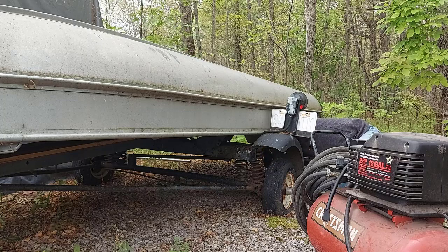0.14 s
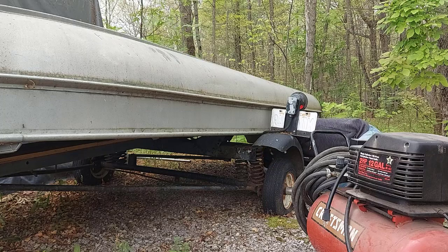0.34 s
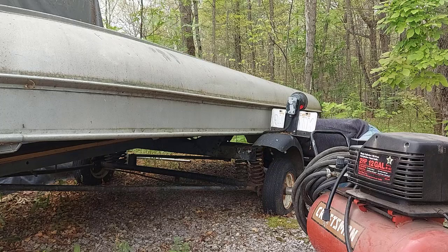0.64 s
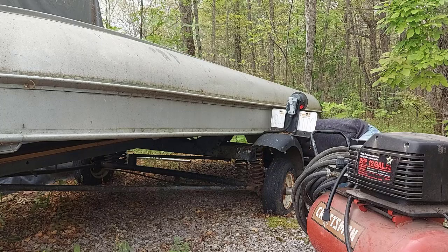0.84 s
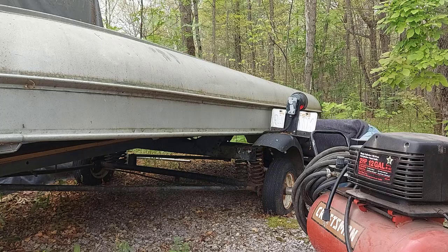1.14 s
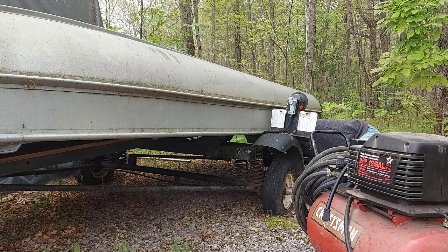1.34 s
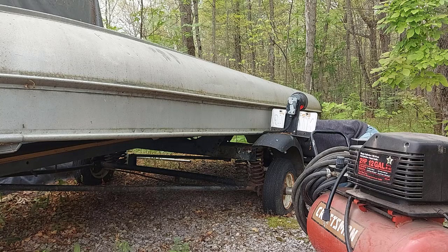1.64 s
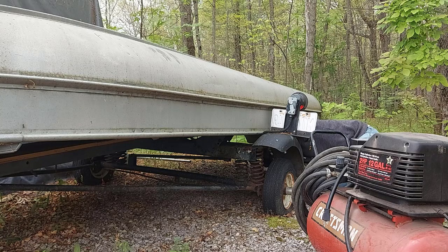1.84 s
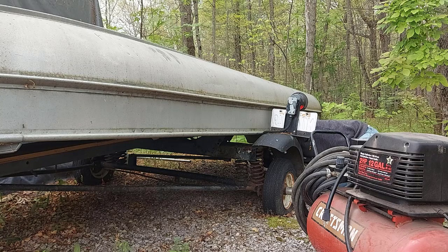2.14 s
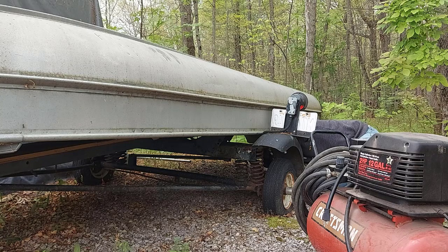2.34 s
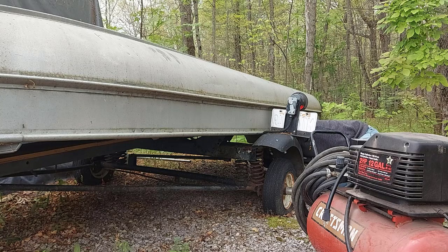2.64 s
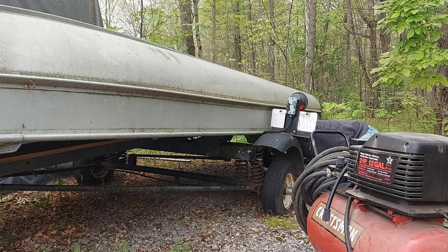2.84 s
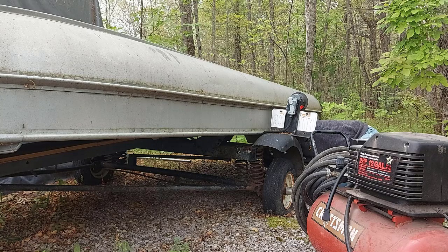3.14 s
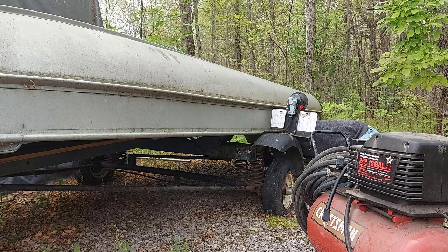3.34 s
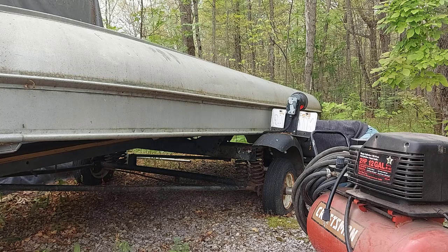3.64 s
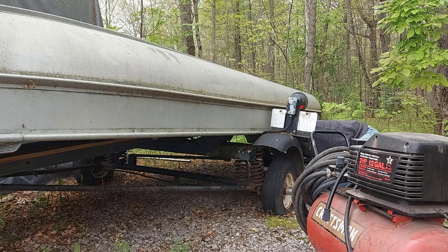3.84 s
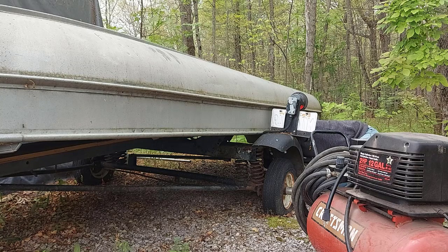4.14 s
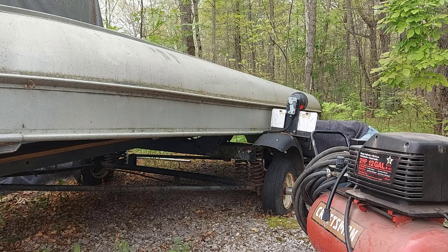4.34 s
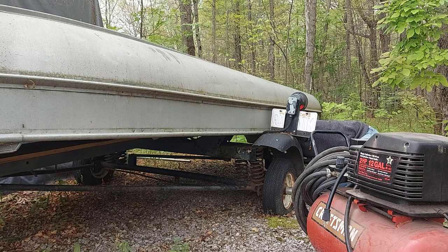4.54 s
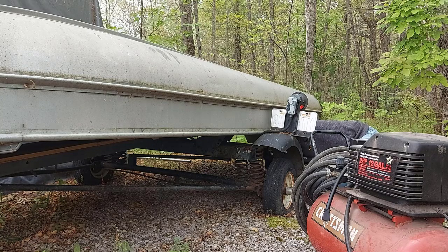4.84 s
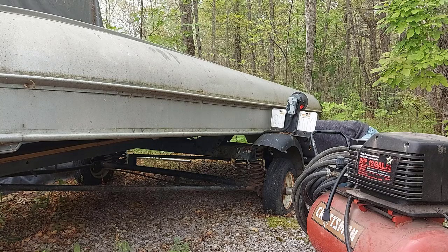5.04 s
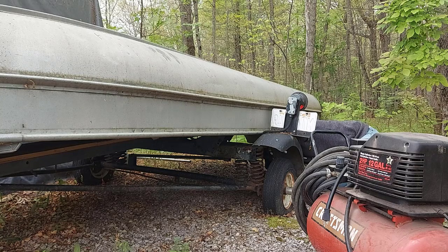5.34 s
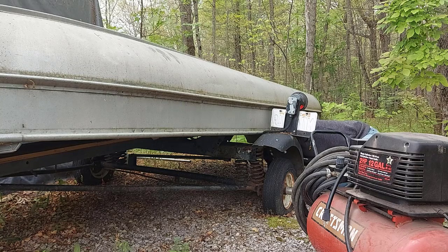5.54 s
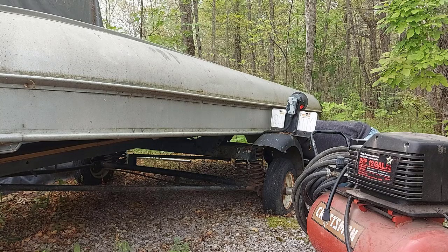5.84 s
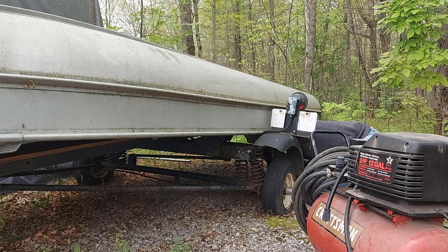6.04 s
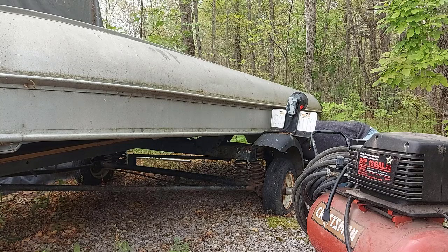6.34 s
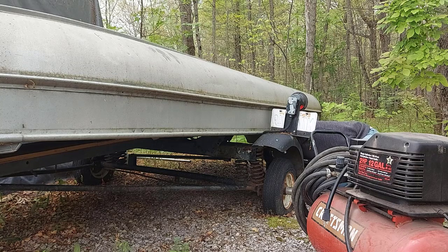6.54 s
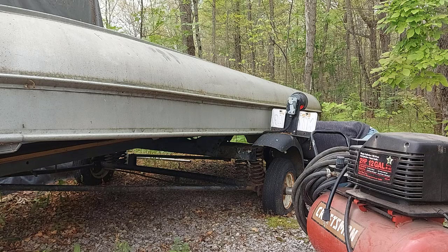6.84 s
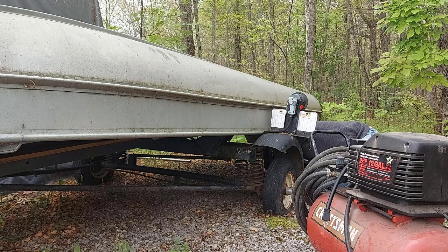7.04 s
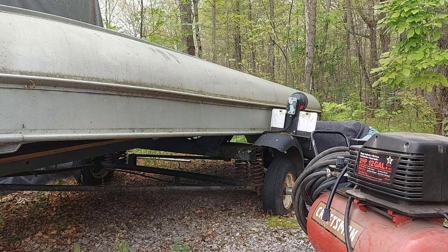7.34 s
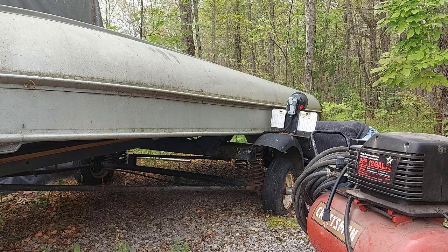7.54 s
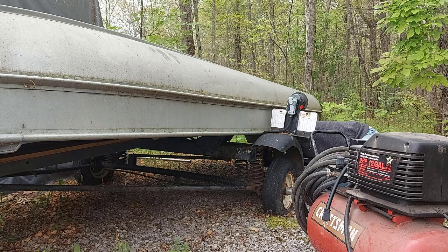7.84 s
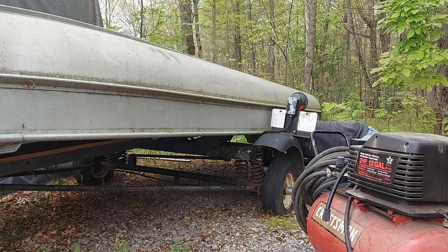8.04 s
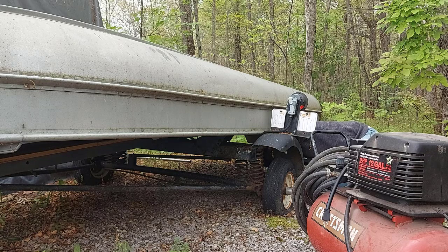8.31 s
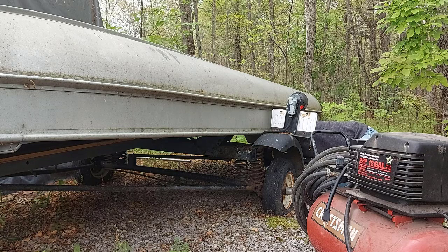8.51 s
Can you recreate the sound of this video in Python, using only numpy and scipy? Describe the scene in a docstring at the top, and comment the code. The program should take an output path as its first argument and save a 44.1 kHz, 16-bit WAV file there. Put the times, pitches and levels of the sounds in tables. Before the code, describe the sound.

Bumps and scrapes on hollow sheet metal, short violent air blasts, then a steady pressurised hiss with a thin whistle, while a small bird buzzes nearby.

```python
"""Beside an upturned metal boat in a wooded yard, over faint steady air, hands and hose rub and knock the hull,
whose sheet-metal modes ring; a low rumble swells mostly as they do. Bright puffs and snaps of noise start with a
long fading hiss. A small bird starts to give rising calls, their pitch warbling fast enough to buzz. An air chuck
blasts noise from its loose gap, then seals on a trailer tire's valve: air hisses through hose and regulator, with
a whistle. Later it blasts loose twice, the hiss fading in between, and at the end it seals again."""
import sys
import numpy as np
from scipy import signal
from scipy.fft import rfft, irfft
from scipy.io import wavfile
from scipy.ndimage import uniform_filter1d

SR = 44100
rng = np.random.default_rng(int(sys.argv[2]) if len(sys.argv) > 2 else 0)


def store_wav(level_fs):
    """Save 16-bit WAV to argv[1]."""
    pcm = np.round(np.clip(np.atleast_2d(level_fs), -1, 1) * 32767)
    wavfile.write(sys.argv[1], SR, pcm.T.astype(np.int16))


def level_to_linear(level):
    """Convert decibel levels to linear amplitude factors, elementwise."""
    exponent = np.asarray(level, float) / 20
    return 10 ** exponent


N = 382347  # length in samples

# Colours are relative, since the noise is later scaled to rms 1. Likeness: 1 = same left and right, 0 = unrelated.
# Colour of the low rumble: pitch_hz, density_db (per Hz)
RUMBLE_COLOUR = [(12, -50), (20, -29), (51, -10), (75, 1), (178, -10.5), (216, -10.5), (253, -17.5),
                 (300, -9), (390, -41), (660, -120)]
# Swells of the rumble: full_s (when full level is reached), length_s, level_db
RUMBLE_SWELLS = [(0.077, 0.11, -43.5), (0.403, 0.21, -39.5), (1.156, 0.28, -46), (1.573, 0.93, -46.5),
                 (2.793, 0.034, -42), (3.016, .5, -49), (3.61, 0.38, -44), (4.148, 0.42, -48),
                 (4.758, 0.97, -47), (5.713, .18, -41.5), (7.053, .25, -50), (7.52, 0.36, -42.5),
                 (7.999, .7, -40)]
# Colour of the steady air of the woods: pitch_hz, density_db (per Hz)
WOODS_COLOUR = [(88, -24.5), (150, 0.5), (186, -17), (308, -10), (420, -18.5), (1050, -9), (3440, -28),
                (4170, -26), (5920, -29.5), (7930, -25.5), (12600, -21.5), (14200, -20.5), (15700, -46)]
# Left-right likeness of the yard: pitch_hz, likeness
YARD_LIKENESS = [(60, 0.94), (240, 0.81), (950, -0.17), (3770, -0.34), (15000, 0.17)]
# A long fading hiss, short rustles, dry ticks with two knocks: start_s, level_db, t60_s (time to fall 60 dB)
BRIGHT_PUFFS = [(.002, -57, 2.1), (.137, -52, 0.47), (0.23, -58.5, .2), (2.859, -38, .04),
                (7.501, -44, .06)]
# Bird calls: start_s, hold_s, level_db
BIRD_CALLS = [(0.283, 0.28, -39.5), (2.608, 0.25, -35), (5.195, 0.68, -36.5), (7.707, 0.34, -38)]
# Partials of the bird's voice: multiple (of its base rate), level_db (relative), breathiness (0-1)
BIRD_PARTIALS = [(5, -23, .6), (6, 0, .2), (7, -9, .05), (12, -20, 1)]
# Hands and hose rubbing trailer and hull: full_s, length_s, level_db, upper_db (upper modes, relative to the low)
HULL_RUBS = [(0, 0.27, -58, -1.5), (0.291, 0.23, -33.5, -4.5), (0.66, .01, -40, -30),
             (1.128, 0.0084, -29.5, -5.5), (1.2, 0.22, -45, -17.5), (1.491, 0.51, -44.5, -2),
             (2.862, 0.012, -44.5, 0.5), (5.626, 0.026, -31, -12), (5.698, .15, -39.5, -22),
             (7.099, 0.38, -48.5, -7), (7.456, .03, -43.5, -5.5), (7.512, .06, -37, -4.5),
             (7.577, 0.0081, -32.5, -7), (7.817, .18, -43, -12.5), (7.983, 0.15, -36, -13.5),
             (8.29, 0.12, -39, 1.5), (8.488, 0.09, -41.5, -8)]
# Knocks on the hull: start_s, blow_db, clank_db (relative to the blow), boom_db (deepest mode, relative);
# these set the strength of each hit ahead of its ring
HULL_KNOCKS = [(0.281, -33.5, -4.5, -18), (0.312, -28.5, -27, -14), (0.406, -33.5, -22, 8),
               (0.651, -26.5, -34, -13), (1.137, -29, -10, 0.5), (2.861, -35.5, 4, -16),
               (5.551, -18.5, 3, -15), (5.576, -9, -15, -29), (5.685, -15.5, -15, 2),
               (7.478, -31.5, -22, 2), (7.501, -28, 4.5, -12), (7.576, -17.5, -16, -15),
               (7.974, -27, -24, -14)]
# Sheet-metal modes of the hull: pitch_hz, level_db (relative), t60_s (before the extra damping)
HULL_MODES = [(122.2, -11, 1), (178, -8.5, 0.13), (225.2, -20.5, 0.18), (253, -0.5, 0.39), (334.7, 1, 0.12),
              (380.5, -8, 0.14), (442, -13, 0.068), (505.5, -6.5, 0.042), (595, -13.5, 0.018),
              (782, -9, 0.013)]
# Air through hose and regulator; it dies slowly while the hose refills: time_s, flow_db
AIR_FLOW = [(1.46, -85), (1.52, -54), (1.75, -52), (1.81, -50), (2.3, -49.5), (2.81, -46.5), (2.85, -45),
            (3.46, -40.5), (5.43, -37), (5.801, -47.5), (6.669, -67), (7.05, -86.5), (8.3, -90),
            (8.42, -39), (8.67, -37.5)]
# Colour of the hose's rush: pitch_hz, density_db (per Hz)
HOSE_COLOUR = [(240, -35.5), (400, -20), (852, -14.5), (1150, -9.5), (1240, -14.5), (1400, -9), (1650, -11),
               (2040, -10.5), (2750, -15.5), (2970, -9), (4170, -5.5), (5490, -6.5), (8110, -4),
               (9000, -16.5), (11700, -43.5), (19800, -120)]
# Narrow resonances of the air path: pitch_hz, width_hz (6 dB down), peak_db
HOSE_RESONANCES = [(1380, 160, -9), (1980, 160, -11), (3610, 120, -5), (4050, 260, -4), (4540, 60, -3),
                   (5810, 70, -3), (6140, 80, -3), (6440, 60, -3), (7290, 100, 0), (7870, 120, -3)]
# Whistle of the regulator seat: pitch_hz, width_hz (6 dB down), peak_db
SEAT_WHISTLE = [(7930, 260, -7), (8190, 310, -3.5)]
# Colour of the hose's bright top: pitch_hz, density_db (per Hz)
HISS_COLOUR = [(7500, -18), (8800, -12), (9300, -7), (10500, -1), (12400, 0.5), (15500, -1)]
# Left-right likeness of the hose: pitch_hz, likeness
HOSE_LIKENESS = [(300, 0.3), (950, 0.86), (3800, 0.25), (7000, 0.43), (15000, 0.098)]
# How much louder the hose is on the left: pitch_hz, left_over_right_db
HOSE_LEAN = [(60, 4.5), (120, 7), (240, -2.5), (480, 1), (950, 2.5), (1890, 2), (3770, 0.5), (7520, -6),
             (15000, 4)]
# Chuck sealed on the valve: full_s, length_s, whistle_db
SEALED_TIMES = [(1.775, 4, -43.5), (8.419, .4, -51)]
# Air escaping at the chuck: start_s, hold_s, fizz_db (once filled out), roar_db and bore_db (relative to the fizz)
CHUCK_JETS = [(0.934, .1, -5, -8.5, -20), (1.031, 0.058, -13.5, -11, -20.5), (1.472, 0.083, -31, -27, -26),
              (1.527, 0.12, -28.5, -30.5, -24.5), (1.64, .12, -31.5, -32, -23),
              (5.442, .02, -20.5, 2.5, -15), (5.456, .12, -4, -5, -28), (5.59, 0.079, -27.5, -6.5, -23.5),
              (8.108, 0.25, -21.5, -13.5, -17.5), (8.201, 0.089, -29.5, 1, -14),
              (8.27, 0.1, -9.5, -2.5, -6), (8.379, .03, -22, -1.5, -21)]
# Colour of the fizz, a thin jet: pitch_hz, density_db (per Hz)
FIZZ_COLOUR = [(1760, -57), (3000, -39.5), (5790, -18.5), (6240, -13), (6930, -14.5), (8060, -10),
               (9650, -11.5), (13300, -2), (15700, -7.5)]
# Colour of the roar, a wide jet: pitch_hz, density_db (per Hz)
ROAR_COLOUR = [(590, -55), (1000, -18.5), (1070, -18.5), (1180, -12), (1640, -5.5), (2510, -5.5),
               (7700, -4), (9000, -10.5), (11700, -22.5), (19800, -120)]
# Resonance of the chuck's bore: pitch_hz, width_hz (6 dB down), peak_db
BORE_RESONANCE = [(1604, 690, 3.5)]
# Colour of the air slapping rim and tire: pitch_hz, density_db (per Hz)
SLAP_COLOUR = [(60, -10.5), (150, -7.5), (350, -5), (600, -6), (900, -4), (1200, -14)]
# Stronger slaps of the jet on rim and tire: full_s, length_s, level_db
TIRE_SLAPS = [(0.945, 0.069, -30.5), (1.03, 0.044, -33.5), (5.468, 0.02, -27), (5.504, 0.015, -32.5),
              (5.559, 0.026, -15.5), (8.287, 0.098, -28.5)]
# Left-right likeness of the jets: pitch_hz, likeness
JET_LIKENESS = [(300, 0.87), (950, 0.85), (3800, .3), (7000, .1), (15000, .05)]


def evened(x):
    """Scales to rms 1."""
    return x / np.sqrt(np.mean(x ** 2) + 1e-20)


def read(points, hz):
    """Reads a table on a log-frequency axis."""
    f, value = np.transpose(points)
    return np.interp(np.log(hz + 1), np.log(f + 1), value)


def band_noise(order, low_hz, high_hz):
    """Two unrelated channels of noise kept to one band, at rms 1."""
    band = signal.butter(order, [low_hz, high_hz], "bandpass", fs=SR, output="sos")
    return evened(signal.sosfilt(band, rng.standard_normal((2, N))))


def stroke(s, length, db, rise, sag, fall):
    """Gain that climbs to db at s, sags for the length, then falls; slopes in dB a second."""
    t = np.arange(N) / SR - s
    held = np.clip(t, 0, length)
    return level_to_linear(db + rise * np.minimum(t, 0) - sag * held - fall * np.maximum(t - length, 0))


def noise(colour, same, patchy_db, size=1024, peaks=()):
    """Two partly alike channels of random short-time spectra with drifting patches, at rms 1."""
    hop, bins = size // 4, size // 2 + 1
    hz = np.fft.rfftfreq(size, 1 / SR)
    a, b, c, d, patches = (rng.standard_normal((N // hop + 5, bins), dtype=np.float32).T for _ in range(5))
    patches = uniform_filter1d(patches, size=10, axis=0)  # smooth over pitch, then over time
    patches = evened(uniform_filter1d(patches, size=12, axis=1))
    edge_db = -80 * ((hz < colour[0][0]) | (hz > colour[-1][0]))  # nearly silent outside the table
    power = level_to_linear(read(colour, hz) + edge_db) ** 2
    for f, width, db in peaks:
        power = power + level_to_linear(db) ** 2 / (1 + (2 * (hz - f) / width) ** 2) ** 2
    like = np.clip(read(same, hz), -1, 1)[:, None]
    one = a + 1j * b
    other = like * one + np.sqrt(1 - like ** 2) * (c + 1j * d)
    spectra = np.array([one, other], dtype=np.complex64)
    spectra *= level_to_linear(patchy_db * patches) * np.sqrt(power)[:, None]
    return evened(signal.istft(spectra, nperseg=size, noverlap=size - hop)[1][:, :N])


def heard(x, echo_db, t60, left=((1, 0), (2, 0))):
    """Direct sound and sparse reflections from hull, gravel and trunks, different at each microphone."""
    size = SR // 4
    slots = np.arange(40, size - 22, 22)  # one reflection in every 22 samples
    at = slots + rng.integers(0, 22, (2, len(slots)))
    taps = np.zeros((2, size))
    np.put_along_axis(taps, at, rng.choice([-1., 1.], at.shape), axis=1)
    taps *= level_to_linear(-60 * np.arange(size) / SR / t60)
    echoes = rfft(taps / np.linalg.norm(taps[0]), 2 * size)
    hz = np.fft.rfftfreq(2 * size, 1 / SR)
    scatter = level_to_linear(echo_db) * hz / (hz + 700)  # long waves pass small obstacles and reach both microphones alike
    path = (1 + scatter * echoes) / np.sqrt(1 + scatter ** 2)
    lean = level_to_linear(np.outer([.5, -.5], read(left, hz)))
    path = np.roll(irfft(path * lean), 256, axis=1)[:, :size]  # room for ripple ahead of the direct sound
    return signal.oaconvolve(np.atleast_2d(x), path, axes=1)[:, 256:N + 256]


def yard():
    """Low rumble, swelling mostly as the hull is rubbed and knocked, over the faint steady air of the woods."""
    rumble_db, woods_db = -57, -54.5
    rise, fall = 97, 90  # dB per s
    swell = np.max([stroke(*row, rise, 0, fall) for row in RUMBLE_SWELLS], axis=0)
    rumble = noise(RUMBLE_COLOUR, YARD_LIKENESS, 2.7, size=4096) * np.maximum(swell, level_to_linear(rumble_db))
    return rumble + level_to_linear(woods_db) * noise(WOODS_COLOUR, YARD_LIKENESS, 0.5)


def bright_puffs():
    """Bright puffs and snaps of noise: a long fading hiss, short rustles, dry ticks with two knocks."""
    t, level = np.arange(N) / SR, np.zeros(N)
    for s, db, t60 in BRIGHT_PUFFS:
        level += (t > s) * level_to_linear(db - 60 * np.maximum(t - s, 0) / t60)
    return uniform_filter1d(level, size=60) * band_noise(1, 4500, 13500)


def bird():
    """A narrow stack of partials that swoops up and holds, warbling fast enough to buzz."""
    buzz_hz, buzz_depth = 208, .02  # fast warble of the pitch; depth as a share of it
    low_hz, top_hz, swoop_s, droop = 5500, 7400, .02, 1000  # glide of the 0 dB partial; droop in Hz per s squared
    rise, sag, fall, fade_clears = 2000, 15, 83, 140  # dB per s
    main_multiple = BIRD_PARTIALS[1][0]
    out = np.zeros(N + SR)
    t = np.arange(SR) / SR
    for s, hold, db in BIRD_CALLS:
        wander = evened(uniform_filter1d(rng.standard_normal((2, SR)), size=90, axis=1))
        past = np.maximum(t - hold, 0)
        effort = level_to_linear(-fade_clears * past)  # the fading call loses buzz and side partials
        buzz = effort * np.sin(2 * np.pi * np.cumsum(buzz_hz * (1 + 0.019 * wander[0])) / SR)
        glide_hz = top_hz - (top_hz - low_hz) * np.exp(-t / swoop_s) - droop * t ** 2
        base_hz = glide_hz / main_multiple * (1 + buzz_depth * buzz + 0.007 * wander[1])
        turns = np.cumsum(base_hz) / SR
        breath = evened(uniform_filter1d(rng.standard_normal(SR), size=30))  # smears a partial into a band
        voice = np.zeros(SR)
        for multiple, level_db, airy in BIRD_PARTIALS:
            gain = level_to_linear(level_db) * (effort if level_db else 1)
            voice += gain * (1 - airy + airy * breath) * np.sin(2 * np.pi * multiple * turns)
        shape_db = np.minimum(rise * (t - .004), 0) - sag * t - fall * past
        out[round(s * SR):][:SR] += np.sqrt(2) * level_to_linear(db + shape_db + 0.5 * wander[1]) * voice
    return out[:N]


def hull():
    """Rubs are dense uneven slips, knocks soft blows with a clank; both ring the same sheet-metal modes."""
    t = np.arange(SR // 2) / SR
    modes = np.array([level_to_linear(db - 60 * t / t60) * np.sin(2 * np.pi * hz * t) for hz, db, t60 in HULL_MODES])

    rise, sag, fall = 830, 40, 106  # dB per s
    slip_size = level_to_linear(0.76 * np.minimum(rng.exponential(1, N), 4))
    slips = slip_size * rng.choice([-1, 1], N) * (rng.random(N) < 900 / SR)  # about 900 slips a second
    damped = modes * level_to_linear(-200 * t)  # a resting hand shortens the ring
    deep = np.array(HULL_MODES)[:, 0] < 420
    low, high = (evened(signal.oaconvolve(slips, damped[part].sum(axis=0))[:N]) for part in (deep, ~deep))
    rubs = np.zeros(N)
    for s, length, db, upper_db in HULL_RUBS:
        rubs += stroke(s, length, db, rise, sag, fall) * (low + high * level_to_linear(upper_db))

    blows, clanks, booms = np.zeros((3, N))
    for s, db, clank_db, boom_db in HULL_KNOCKS:
        at = round(s * SR)
        blows[at], clanks[at], booms[at] = level_to_linear(db), level_to_linear(db + clank_db), level_to_linear(db + boom_db)
    push = np.exp(-.5 * ((t[:200] - t[100]) / 0.00029) ** 2)  # a padded blow lasts a moment, misses high modes
    panel = signal.oaconvolve(modes[1:].sum(axis=0) * level_to_linear(-150 * t), push)[100:]
    panel = panel * (1 - np.exp(-np.arange(len(panel)) / SR / 0.003))  # soft start
    panel = 0.5 * panel / abs(panel).max()
    boom = modes[0] * level_to_linear(-90 * t)
    crack = rng.standard_normal(len(t)) * (level_to_linear(-60 * t / 0.07) + .45 * level_to_linear(-60 * t / .3))
    clank = signal.sosfilt(signal.butter(2, [700, 3600], "bandpass", fs=SR, output="sos"), crack)
    strikes = ((blows, panel), (booms, boom), (clanks, clank))
    return rubs + sum(signal.oaconvolve(hit, ring)[:N] for hit, ring in strikes)


def hose():
    """Air rings the narrow fittings; a sealed chuck adds a whistle, a steady seep and the tire filling."""
    seep_db, fill_db = -43, -52.5  # steady while sealed: bright seep, dull rush inside the tire
    top_db = 1  # bright top relative to the flow
    whistle_sag = 1.5  # dB per s
    body = level_to_linear(6.5) * noise(HOSE_COLOUR, HOSE_LIKENESS, 0.75, size=2048, peaks=HOSE_RESONANCES)
    whistle = noise([(7000, -44.5), (9000, -37.5)], HOSE_LIKENESS, 1.0, peaks=SEAT_WHISTLE)
    top = noise(HISS_COLOUR, HOSE_LIKENESS, 1.3)
    dull = band_noise(2, 650, 1200)
    flow = level_to_linear(np.interp(np.arange(N) / SR, *np.transpose(AIR_FLOW)))
    sealed = sum(stroke(s, length, 0, 150, 0, 150) for s, length, _ in SEALED_TIMES)
    singing = sum(stroke(*row, 150, whistle_sag, 40) for row in SEALED_TIMES)
    top_level = np.hypot(level_to_linear(top_db) * flow, level_to_linear(seep_db) * sealed)
    return flow * body + level_to_linear(fill_db) * sealed * dull + singing * whistle + top_level * top


def chuck():
    """A turbulent jet: thin fizz through a crack, a wide roar as the gap opens; it flutters, starts abruptly."""
    swell_db, swell_s = 9, 0.03  # a jet starts this much softer and fills out
    fall, knee_s = 796.5, 0.0089  # fall in dB per s, bending in smoothly
    drain_db, drain_fall = -31, 122.5  # the last air drains softly through the wide gap; dB, dB per s
    roar_late_db, drain_fizz_db = 1, 1  # the roar fills out more than the fizz; fizz in the draining air
    slap_db, slap_rise, slap_fall = -28, 1500, 500  # steady share relative to the roar; dB per s
    flutter_db = .6 * evened(uniform_filter1d(rng.standard_normal(N), size=400))
    thin, wide, ringing, slaps = np.zeros((4, N))
    for s, hold, db, roar_db, bore_db in CHUCK_JETS:
        t = np.maximum(np.arange(N) / SR - s, 0)
        past = knee_s * np.logaddexp(0, (t - hold) / knee_s)
        unfilled = np.exp(-t / swell_s)
        opened = np.minimum(t / 0.0042, 1) * level_to_linear(db - swell_db * unfilled)
        jet = opened * level_to_linear(-fall * past)
        drain = opened * level_to_linear(drain_db - drain_fall * past)
        thin += jet + level_to_linear(drain_fizz_db) * drain
        wide += level_to_linear(roar_db - roar_late_db * unfilled) * jet + drain
        ringing += level_to_linear(bore_db) * jet
        slaps += level_to_linear(roar_db + slap_db) * jet
    slaps += sum(stroke(*row, slap_rise, 0, slap_fall) for row in TIRE_SLAPS)
    fizz = noise(FIZZ_COLOUR, JET_LIKENESS, 0.82, size=512)
    roar = noise(ROAR_COLOUR, JET_LIKENESS, 2.3)
    bore = noise([(1000, -30), (2500, -30)], JET_LIKENESS, 2.5, peaks=BORE_RESONANCE)
    slap = noise(SLAP_COLOUR, JET_LIKENESS, 3.7)
    return level_to_linear(flutter_db) * (thin * fizz + wide * roar + ringing * bore + slaps * slap)


def scene():
    """All sources at the two microphones."""
    left_late = 1  # samples; the wheel stands to the right
    air = heard(chuck(), 1.0, 0.093) + heard(hose(), -1.3, 0.066, left=HOSE_LEAN)
    left, right = air + heard(hull(), 5.7, 0.064) + heard(bird(), 1.5, 0.16)
    return np.array([np.roll(left, left_late), right]) + bright_puffs() + yard()


def top_cut(x):
    """Nothing passes above the cut-off."""
    return signal.sosfilt(signal.butter(12, 15810, fs=SR, output="sos"), x)


def record(dry):
    """The blasts overload the input, a little unevenly, which adds a deep thud."""
    lopsided = .2  # share of the squared signal, kept to a deep band
    thud_band = signal.butter(2, [16, 45], "bandpass", fs=SR, output="sos")
    thud = signal.sosfilt(thud_band, dry ** 2)
    mix = np.clip(dry + lopsided * thud, -1, 1)
    return top_cut(mix)


dry = scene()
out = record(dry)
store_wav(out)
```